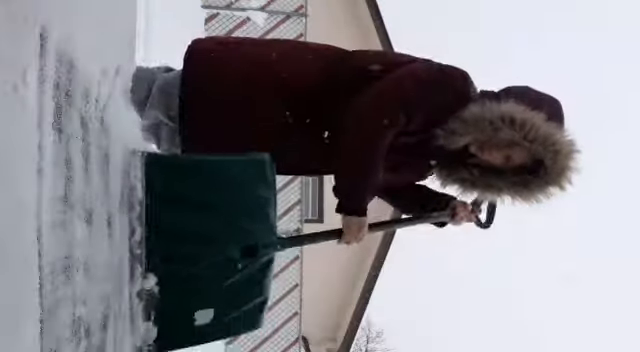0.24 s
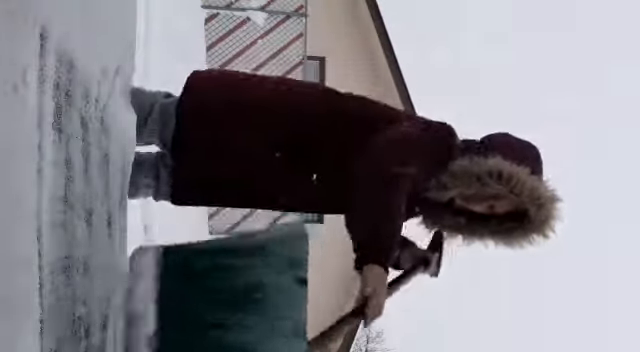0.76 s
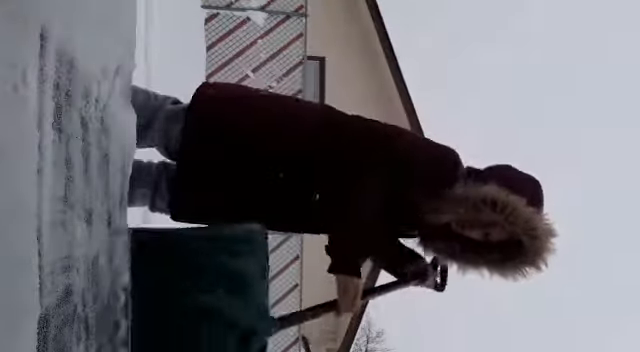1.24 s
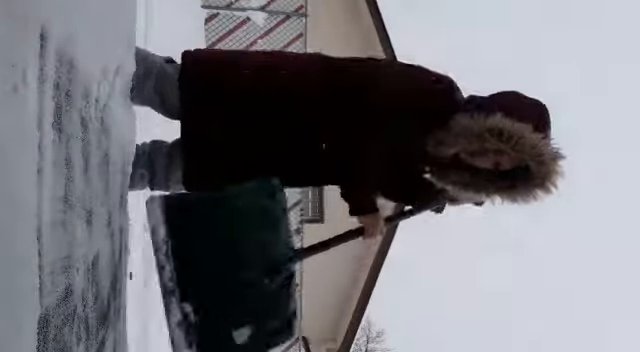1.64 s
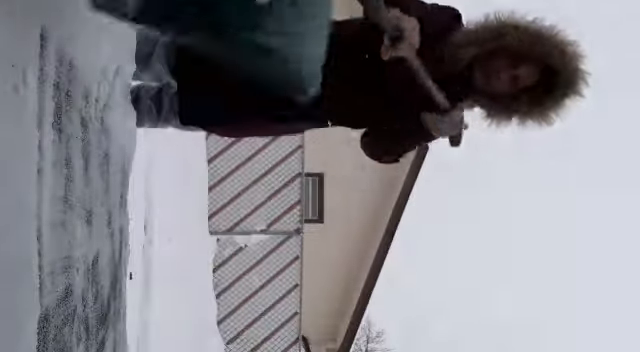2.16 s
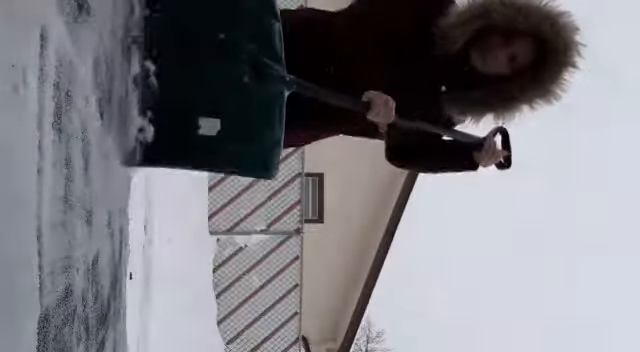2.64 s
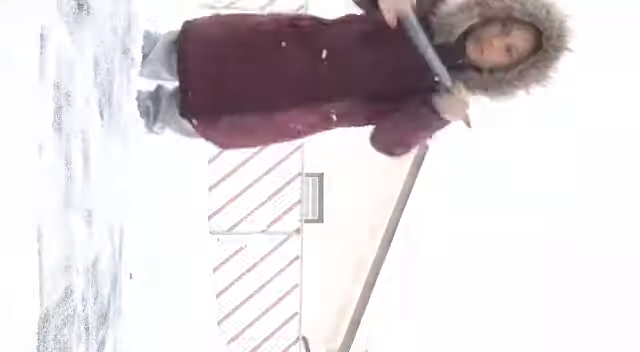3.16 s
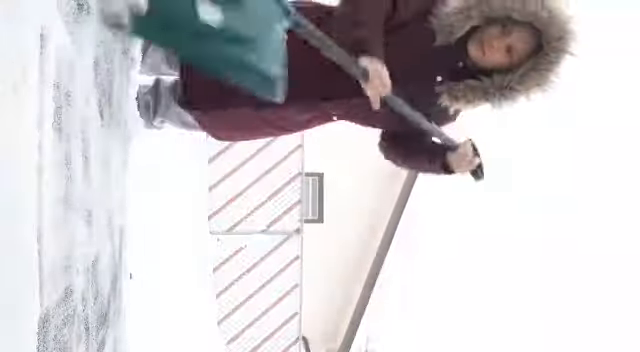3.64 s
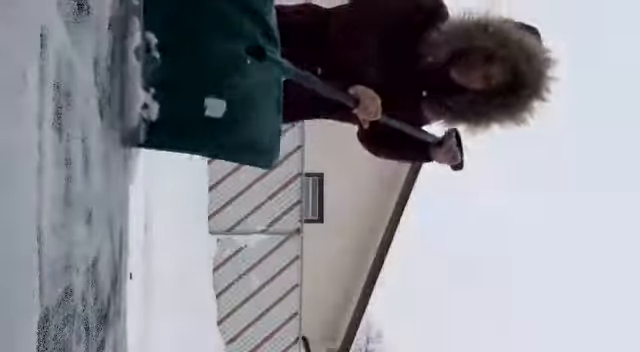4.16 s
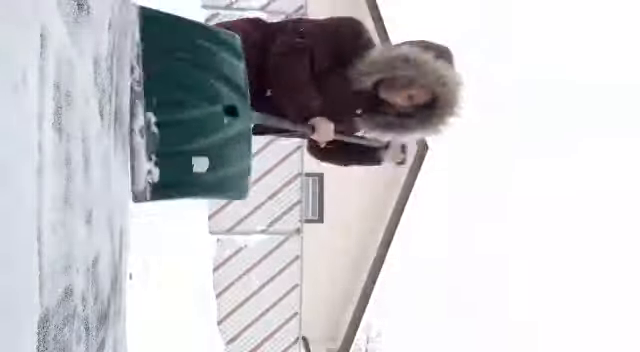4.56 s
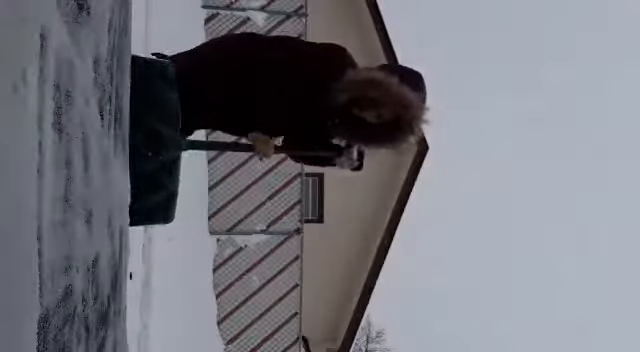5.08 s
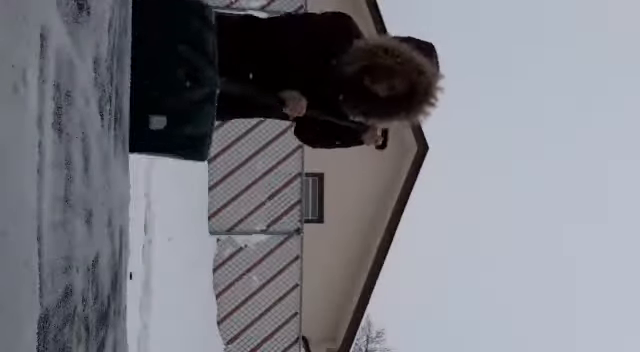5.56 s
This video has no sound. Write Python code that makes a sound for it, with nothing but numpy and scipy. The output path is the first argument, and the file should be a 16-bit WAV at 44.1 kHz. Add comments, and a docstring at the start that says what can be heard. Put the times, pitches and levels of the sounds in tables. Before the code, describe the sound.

Starting mid-stroke, a shovel scrapes hard and unevenly, lifts, then knocks down and scrapes again, about seven strokes in six seconds. The scoop booms like a hollow tub while its edge crackles, catches and squeaks on icy ground. Heard outdoors from a few steps away, mostly dry with a short reflection, the right side a little louder, and very quiet air between pushes.

```python
"""Snowy pavement in front of a house, a plastic snow shovel at work a few steps from two microphones.
Most strokes open with a hollow knock: a blow rings the decaying low modes of the scoop. The edge then
grinds over grit and ice, noise of tiny bursts through the blade's resonances, with catches and short
squeaks, while friction noise through the same low modes makes the scoop boom. Behind it lie a short
outdoor echo, dull swishes of coat, boots and snow, and a faint rumble of air."""
import sys
import numpy as np
from scipy import signal
from scipy.fft import rfft, irfft, next_fast_len
from scipy.io import wavfile
from scipy.ndimage import uniform_filter1d

SR = 44100
rng = np.random.default_rng(int(sys.argv[2]) if len(sys.argv) > 2 else 0)


def master_out(mix):
    """Clip the mix to full scale and print it as 16-bit PCM to the path in sys.argv[1]."""
    frames = np.transpose(np.atleast_2d(mix))
    ceiling = np.clip(frames, -1, 1)
    pcm = np.round(ceiling * 32767).astype(np.int16)
    wavfile.write(sys.argv[1], SR, pcm)


N = 256220
TIME = np.arange(N) / SR
SIZE = next_fast_len(N)
FREQ = np.maximum(np.arange(SIZE // 2 + 1) * SR / SIZE, 1)


def from_db(db):
    """Decibels to gain."""
    return 10 ** (np.asarray(db) / 20)


def rms_one(x):
    """Scale to unit power."""
    return x / np.sqrt(np.mean(x ** 2) + 1e-20)


def over_hz(points):
    """Join (Hz, value) points on a log-frequency axis."""
    hz, value = np.transpose(points)
    return np.interp(np.log(FREQ), np.log(hz), value)


def colour(x, gain):
    """Filter by a gain per frequency."""
    return irfft(rfft(x, SIZE) * gain, SIZE)[..., :N]


def drift(rate):
    """Smooth chance of spread 1: white noise rolled off above a rate in Hz."""
    return rms_one(colour(rng.standard_normal(N), 1 / (1 + (FREQ / rate) ** 2)))


# How alike the two microphones hear diffuse noise: pitch_hz, likeness (1 = identical)
MIC_LIKENESS = [(40, .93), (130, .99), (300, .98), (500, .8), (700, .55), (1100, .85), (2000, .55),
                (4000, .3), (9000, .1)]


def stereo_noise():
    """Spectra of two white noises, more or less alike from band to band."""
    alike = np.clip(over_hz(MIC_LIKENESS), -1, 1)
    mid, side = rfft(rng.standard_normal((2, SIZE)))
    return np.sqrt(1 + alike) * mid + np.sqrt(1 - alike) * side * [[1], [-1]]


def coloured_noise(gain):
    """Stereo noise of unit power with a given gain per frequency."""
    return rms_one(irfft(stereo_noise() * gain, SIZE)[:, :N])


def pulses(envelope_of, rows):
    """Join short events, each (start_s, ..) with its own envelope, by power."""
    power = np.zeros(N)
    for start_s, *columns in rows:
        first = round(start_s * SR)
        age = TIME[:max(N - first, 0)][:SR // 4]
        power[first:][:len(age)] += envelope_of(age, *columns) ** 2
    return np.sqrt(power)


def snap(age, db, rise_s, decay_s):
    """A fast rise and an exponential fall."""
    return from_db(db) * (1 - np.exp(-age / rise_s)) * np.exp(-age / decay_s)


def bursts(rows, octaves):
    """Bell-shaped bursts of noise, each in its own band some octaves wide."""
    out = np.zeros((2, N))
    noise = irfft(stereo_noise(), SIZE)[:, :N]
    for centre_s, db, half_length_s, hz in rows:
        near = abs(TIME - centre_s) < 4 * half_length_s
        edges_hz = [hz / 2 ** (octaves / 2), hz * 2 ** (octaves / 2)]
        band = signal.butter(2, edges_hz, "band", fs=SR, output="sos")
        bell = np.exp(-.5 * ((TIME[near] - centre_s) / half_length_s) ** 2)
        burst = rms_one(bell * signal.sosfilt(band, noise[:, near]))
        out[:, near] += from_db(db) * np.sqrt(np.mean(bell ** 2)) * burst
    return out


# Spectrum of the winter air, strongest in the bass: pitch_hz, relative level_db per Hz
AIR_SPECTRUM = [(15, -60.5), (25, -38), (75, 0.5), (119, -3.5), (340, -12), (389, -12), (495, -13.5),
                (741, -18.5), (945, -19), (1200, -23), (3090, -33), (6550, -32), (8500, -41.5),
                (11500, -39.5), (15500, -70.5)]


def winter_air():
    """A faint rumble: steady bass-heavy noise whose level wavers slightly."""
    noise = coloured_noise(from_db(over_hz(AIR_SPECTRUM)))
    return from_db(-53) * noise * from_db(1.1 * drift(rate=5.7))


# Dull swishes and crunches of coat, boots and snow: centre_s, level_db, half_length_s, pitch_hz
BODY_SWISHES = [(0.532, -48, 0.015, 248), (0.83, -51.5, 0.018, 547), (1.79, -46.5, 0.055, 392),
                (4.63, -52.5, 0.033, 250), (4.79, -56, 0.22, 881)]


def swishes():
    """Cloth and snow rub softly between strokes: broad, bell-shaped bursts of noise."""
    return bursts(BODY_SWISHES, octaves=1.52)


def yard(x, t60, delay_s, dull_hz):
    """A scattered tail that builds up after a delay and dies away, as from the house front and the ground."""
    age = TIME[:SR // 2]
    build_up = np.clip(age / delay_s - 1, 0, 1)
    tail = rng.standard_normal((2, len(age))) * from_db(-60 * age / t60) * build_up
    tail /= np.sqrt(np.sum(tail ** 2, axis=1, keepdims=True))
    return colour(signal.fftconvolve(x, tail, axes=1)[:, :N], 1 / np.hypot(1, FREQ / dull_hz))


TOUCH_S = 0.011  # the edge meets or leaves the ground this fast
RING_OUT_S = 0.034  # the boom fades over this time after the edge lifts


def held(start, end, release_s):
    """A quick attack, a hold from start to end and a release."""
    return np.interp(TIME, [start - TOUCH_S, start, end, end + release_s], [0, 1, 1, 0])


# Pushes of the edge over the ground: pitch_factor of the loaded scoop, treble (relative tilt setting),
# and a pressure curve of time_s, grinding level_db, boom level_db
PUSHES = [(1.0, -2, [(0.0, -21.5, -20), (0.042, -30, -23), (0.104, -21.5, -20), (0.146, -38, -28.5),
          (0.168, -27.5, -33), (0.23, -30, -25), (0.292, -20, -33), (0.33, -56, -31)]),
          (.98, -5, [(0.95, -42, -23), (1.047, -33.5, -43.5), (1.069, -35.5, -41.5), (1.141, -36, -40.5),
          (1.258, -27.5, -24.5), (1.35, -41.5, -27), (1.457, -29, -29.5), (1.504, -38, -41),
          (1.56, -40, -43.5)]), (.98, 0, [(2.345, -34, -23), (2.387, -32, -44), (2.469, -36.5, -38),
          (2.506, -20, -20.5), (2.608, -27, -25.5), (2.63, -31, -37), (2.752, -33.5, -35),
          (2.795, -54, -40)]), (1, 2.5, [(3.317, -38, -36), (3.409, -42, -38), (3.486, -16.5, -27),
          (3.633, -33.5, -37.5), (3.655, -18.5, -28), (3.732, -28.5, -31), (3.754, -37.5, -31.5),
          (3.951, -46, -48), (3.975, -59, -75)]), (.88, -3.5, [(4.28, -41, -19), (4.327, -39, -33.5),
          (4.349, -37, -30.5), (4.431, -26, -26), (4.468, -22.5, -32), (4.49, -39.5, -41)]),
          (.96, -8.5, [(4.96, -48, -30), (5.037, -41.5, -45), (5.059, -43.5, -42), (5.131, -33, -44),
          (5.168, -47, -45), (5.265, -35.5, -39), (5.295, -68, -74)]), (0.83, -8, [(5.722, -39.5, -36.5),
          (5.764, -44, -51), (5.81, -36, -10.5)])]


def per_stroke(values):
    """Hold one value through each stroke and glide to the next in between."""
    ends = [point[0] for _, _, curve in PUSHES for point in (curve[0], curve[-1])]
    return np.interp(TIME, ends, np.repeat(values, 2))


def stroke_controls():
    """Drag gain, treble setting and boom gain; the drag is zero while the edge is lifted."""
    drag, push = 0, 0
    for _, _, curve in PUSHES:
        s, grind_db, boom_db = np.transpose(curve)
        drag = drag + held(s[0], s[-1], TOUCH_S) * from_db(np.interp(TIME, s, grind_db))
        push = push + held(s[0], s[-1], RING_OUT_S) ** 2 * from_db(np.interp(TIME, s, boom_db))
    return drag, per_stroke([treble for _, treble, _ in PUSHES]), push


def load_shift(x):
    """The load on the blade retunes the scoop from stroke to stroke."""
    pitch = per_stroke([factor for factor, _, _ in PUSHES])
    return np.interp(np.cumsum(pitch) % (N - 1), np.arange(N), x)


# Low modes of the scoop before load and damping factors: pitch_hz, relative level_db, t60_s
SCOOP_MODES = [(92, -18.5, 0.086), (148, -11, 0.055), (201.1, 3, 0.038), (244, 4.5, 0.1),
               (304.6, -6.5, 0.03), (341.6, -13, 0.1), (388.3, -20.5, 0.04), (395.5, -14, 0.081),
               (462, -17, 0.061), (600, -18, 0.037)]


def off_centre(hz):
    """0 up to the scoop's main mode, 1 from half an octave above it."""
    main_hz = SCOOP_MODES[3][0]
    return np.clip(2 * np.log2(hz / main_hz), 0, 1)


def boom(push, ring_factor, wander_db, side_db):
    """The dragging edge shakes the scoop: noise through its low modes, the upper ones weakened."""
    out = 0
    for hz, db, t60 in SCOOP_MODES:
        width_hz = np.log(1000) / (np.pi * t60 * ring_factor)
        resonance = 1 / np.hypot(1, (FREQ / hz - hz / FREQ) * hz / width_hz)
        mode = rms_one(colour(rng.standard_normal(N), resonance))
        out = out + from_db(db + side_db * off_centre(hz)) * mode
    # friction limits the swing, so the boom is steadier than free noise
    steady = out / np.sqrt(uniform_filter1d(out ** 2, size=SR // 30) + 1e-9)
    return load_shift(steady) * push * from_db(wander_db * drift(rate=54))


# The blade knocks on the ground: start_s, level_db, pitch_factor, ring_length_factor,
# level_db of the cracking snow crust, upper modes' added level_db
GROUND_KNOCKS = [(.002, -9, 0.81, 0.4, -42, -16), (0.12, -16, 1.05, 1.2, -19.5, -2),
                 (0.171, -17.5, 0.8, 0.66, -31, -7), (0.306, -16.5, 1.01, 1.1, -47, -9),
                 (0.921, -6.5, 1.015, 0.81, -18, -1), (1.191, -17, 1.02, 0.74, -52, 6.5),
                 (1.479, -17, 0.87, 1.33, -22, -9), (2.3064, -5.5, 1.014, 1.65, -14.5, 4),
                 (2.51, -13, 0.96, 0.75, -18.5, -10.5), (3.2354, -19, 1.03, 1.38, -21.5, 9),
                 (3.3544, -16.5, 1.025, 1.8, -24, -7), (4.2285, -8.5, .897, 0.79, -24.5, 10.5),
                 (4.271, -3, .84, 0.55, -28, 3.5), (4.93, -12, 0.88, 0.53, -25.5, 21.5),
                 (5.018, -14.5, 0.98, 0.34, -26.5, 12), (5.194, -27, 0.9, 0.55, -32, -2),
                 (5.773, -10, 1.01, 0.68, -13.5, 16)]


def knocks(contact_s):
    """Each knock rings the scoop; load shifts and damps it, and a blow on a corner wakes the upper modes."""
    out = np.zeros(N)
    for start_s, db, pitch, length, _, side_db in GROUND_KNOCKS:
        first = round(start_s * SR)
        age = TIME[:N - first][:SR // 3]
        ring = 0
        for hz, mode_db, t60 in SCOOP_MODES:
            start_db = mode_db + side_db * off_centre(hz) + rng.normal(0, 1)
            decay = from_db(start_db - 60 * age / (t60 * length))
            ring = ring + decay * np.sin(2 * np.pi * hz * pitch * age)
        out[first:][:len(age)] -= from_db(db) * ring * (1 - np.exp(-(age / contact_s) ** 2))
    return out


def radiate(x, low_hz):
    """The open scoop radiates little deep bass."""
    cut = signal.butter(2, low_hz, "high", fs=SR, output="sos")
    return signal.sosfilt(cut, signal.sosfilt(cut, x))


# The edge catches on a rough spot and slips free: start_s, level_db, decay_s
EDGE_CATCHES = [(0.058, -15, 0.0099), (0.078, -10.5, 0.012), (.239, -10, .012), (.274, -16.5, 0.013),
                (.284, -6.5, 0.012), (1.188, -20.5, .007), (1.253, -14, 0.013), (1.474, -13, 0.016),
                (1.501, -15, 0.009), (2.37, -20, .012), (2.384, -15, .012), (2.45, -21, 0.0085),
                (2.483, -30.5, 0.0059), (2.505, -18.5, 0.036), (2.558, -15.5, 0.031), (2.596, -7, 0.0049),
                (2.623, -12.5, 0.0024), (2.662, -18.5, .007), (2.764, -23, .009), (3.425, -28.5, .004),
                (3.478, -15, 0.004), (3.591, -18.5, 0.032), (3.643, -18.5, .01), (3.671, -10, .008),
                (3.721, -10.5, 0.009), (3.782, -21.5, 0.015), (3.856, -34.5, .008), (4.35, -15, 0.0043),
                (4.416, -20, 0.012), (5.087, -29, .012), (5.127, -27.5, .008), (5.246, -23.5, 0.018)]
CATCH_RISE_S = .0012
KICK_DB, KICK_RISE_S, KICK_DECAY_S = -6, .004, 0.017  # jolt to the scoop, level relative to the catch


def scoop_sound(push):
    """The scoop booms under the drag, is jolted by each catch and rings with each knock."""
    kicks = pulses(snap, [(s, db + KICK_DB, KICK_RISE_S, KICK_DECAY_S) for s, db, _ in EDGE_CATCHES])
    booming = boom(np.hypot(push, kicks), ring_factor=1.9, wander_db=1.83, side_db=-7.0)
    return radiate(booming + knocks(contact_s=0.0021), low_hz=56)


BUMPS_DB, BUMPS_PER_S = 2.1, 18  # uneven ground makes the pressure waver
# small random snags, relative to the drag
SNAGS_PER_S, SNAG_DB, SNAG_SPREAD_DB, SNAG_DECAY_S = 43, 4.5, 3.5, .005


def rough_ground():
    """Gain of the drag: it wavers over bumps and jumps at small snags."""
    times = TIME[rng.random(N) < SNAGS_PER_S / SR]
    sizes_db = SNAG_DB + SNAG_SPREAD_DB * np.clip(rng.standard_normal(len(times)), -1, 1)
    snags = pulses(snap, [(s, db, CATCH_RISE_S, SNAG_DECAY_S) for s, db in zip(times, sizes_db)])
    return rms_one(np.hypot(1, snags)) * from_db(BUMPS_DB * drift(rate=BUMPS_PER_S))


# The lifted blade brushes the snow: start_s, level_db, rise_s, decay_s
SNOW_BRUSHES = [(.496, -50, .001, 0.0067), (.86, -44, 0.048, 0.12), (1.853, -39, 0.022, 0.019),
                (2.174, -44, 0.023, 0.049), (2.282, -41.5, 0.015, 0.052)]
CRACK_RISE_S, CRACK_DECAY_S = 0.00046, 0.013
TRICKLE_DB, TRICKLE_DECAY_S = -49.5, 0.02  # loose snow runs on after each stroke


def edge_force(drag):
    """Drag over uneven ground, plus catches, cracking crust, brushed snow and the trickle after each stroke."""
    catches = [(s, db, CATCH_RISE_S, decay_s) for s, db, decay_s in EDGE_CATCHES]
    cracks = [(s, crack_db, CRACK_RISE_S, CRACK_DECAY_S) for s, _, _, _, crack_db, _ in GROUND_KNOCKS]
    trickles = [(curve[-1][0], TRICKLE_DB, TOUCH_S, TRICKLE_DECAY_S) for _, _, curve in PUSHES]
    return np.hypot(drag * rough_ground(), pulses(snap, catches + cracks + trickles + SNOW_BRUSHES))


def grit(per_s, spread_db, grain_s):
    """Joint envelope of grains of ice and grit that break under the edge at random, each a very short burst."""
    sizes = from_db(spread_db * np.minimum(rng.exponential(1, N), 4))
    breaks = sizes * (rng.random(N) < per_s / SR)
    fade = np.exp(-2 / (grain_s * SR))
    return rms_one(np.sqrt(signal.lfilter([1], [1, -fade], breaks ** 2 + 1e-18)))


def wandering_contact(hz, shape, streak_db, streak_top_hz):
    """The contact point wanders along the edge, so resonances come and go every few hundredths of a second."""
    streaks = rng.standard_normal(shape)
    for axis in (0, 1, 0, 1):  # smooth over pitch and time, twice
        streaks = uniform_filter1d(streaks, size=3 + 3 * axis, axis=axis)
    depth_db = streak_db / np.hypot(1, hz / streak_top_hz)[:, None]
    shifting = from_db(depth_db * np.clip(rms_one(streaks), -2, 2))
    return shifting / np.sqrt(np.mean(shifting ** 2, axis=1, keepdims=True))


# Upper resonances of the blade: pitch_hz, width_hz, level_db above the grinding spectrum
BLADE_PEAKS = [(445, 17, 13.5), (760, 97, 9.5), (1031, 210, 9), (1400, 60, -0.5), (1440, 50, 1),
               (1642, 180, 1), (1980, 210, 0.5), (2300, 38, 3.5), (2820, 80, 4.5), (4000, 130, 2.5),
               (6660, 620, 3)]
# Spectrum of the grinding edge under those peaks: pitch_hz, relative level_db per Hz
GRIND_SPECTRUM = [(200, -29.5), (380, -1.5), (520, -6), (850, -7.5), (1150, -5.5), (1700, -1.5), (2600, -7),
                  (4100, -6.5), (5200, -10.5), (7000, -7), (7800, -18), (11100, -20), (13500, -26.5),
                  (15500, -48)]


def grinding(force, treble, neutral, tilt, streak_db, streak_top_hz):
    """Breaking grit excites the blade's upper resonances; bare pavement is brighter than snow."""
    peaks_db = sum(db / (1 + (2 * (FREQ - hz) / width) ** 2) for hz, width, db in BLADE_PEAKS)
    noise = coloured_noise(from_db(over_hz(GRIND_SPECTRUM) + peaks_db))
    hz, s, frames = signal.stft(noise, SR, nperseg=512)
    octaves = np.log2(np.clip(hz / 1000, .6, 4))[:, None]
    slope_db = tilt * octaves * (np.interp(s, TIME, treble) - neutral)
    shifting = wandering_contact(hz, frames.shape[1:], streak_db, streak_top_hz)
    return force * signal.istft(frames * from_db(slope_db) * shifting, SR)[1][:, :N]


# Where it sticks, the edge judders at one pitch and squeaks: centre_s, level_db, pitch_hz
EDGE_SQUEAKS = [(.198, -31, 1800), (.292, -31.5, 1050), (1.485, -17.5, 1220), (2.484, -39, 860),
                (2.52, -28.5, 1160), (2.566, -16, 1630), (2.667, -24, 1000), (2.71, -28.5, 1620),
                (2.745, -30, 1730), (3.483, -20.5, 3900), (3.536, -19, 2360), (3.594, -22.5, 3700),
                (3.676, -18.5, 1600), (3.721, -17, 3040), (3.723, -19, 1690), (4.446, -28, 1120),
                (4.468, -36, 796)]
SQUEAK_HALF_S, SQUEAK_OCTAVES = 0.0054, 0.23


def squeaks():
    """Short narrow-band bursts where the edge sticks."""
    return bursts([(s, db, SQUEAK_HALF_S, hz) for s, db, hz in EDGE_SQUEAKS], octaves=SQUEAK_OCTAVES)


CHATTER_DB, CHATTER_PER_S = 1.27, 120  # stick and slip of the edge
# treble setting lost per dB that the edge bites harder than typical; below the lightest it gets no brighter
DULLING, TYPICAL_DB, LIGHTEST_DB = 0.15, -31, -45


def edge_sound(drag, treble):
    """The edge grinds, duller the harder it bites, and squeaks where it sticks."""
    force = edge_force(drag)
    bite_db = 20 * np.log10(np.maximum(force, from_db(LIGHTEST_DB))) - TYPICAL_DB
    chatter = rms_one(from_db(CHATTER_DB * drift(rate=CHATTER_PER_S)))
    grains = grit(per_s=4100, spread_db=3.0, grain_s=0.0029)
    grind = grinding(force * chatter * grains, treble - DULLING * bite_db,
                     neutral=-1.0, tilt=0.47, streak_db=3.5, streak_top_hz=4970)
    return grind + squeaks()


def shovel_sound():
    """Edge and scoop together; the hiss of the edge scatters off the scoop and the pavement."""
    drag, treble, push = stroke_controls()
    edge = edge_sound(drag, treble)
    near_scatter = from_db(-11) * yard(edge, t60=0.059, delay_s=0.002, dull_hz=14220)
    far_scatter = from_db(-27) * yard(edge, t60=0.32, delay_s=0.015, dull_hz=8000)
    edge = from_db(-1.28) * edge + near_scatter + far_scatter
    return edge + from_db(0.4) * scoop_sound(push)


# Level between the microphones: pitch_hz, left minus right level_db
MIC_BALANCE = [(60, -4.5), (300, -4), (480, -3.5), (720, -2.5), (1200, -4.5), (2200, -5), (5000, -6.5),
               (9000, -2.5), (15000, -2.7)]
# Phase between the microphones: pitch_hz, lead of the left in radians
MIC_LEAD = [(60, .03), (250, .14), (600, .15), (860, -2.0), (1290, -1.1), (2840, -2.0), (4000, -1.3),
            (6000, -1.9)]


def microphone_pair(x):
    """Level and phase differences per frequency, shared equally by the two microphones."""
    ear = np.array([[1], [-1]]) / 2
    return colour(x, from_db(over_hz(MIC_BALANCE) * ear) * np.exp(1j * over_hz(MIC_LEAD) * ear))


def scene():
    """The shovel, a little to the right, with its echo, the swishes and the still winter air."""
    shovel = shovel_sound()
    echo = from_db(-25) * yard(shovel, t60=0.32, delay_s=0.01, dull_hz=9000)
    return microphone_pair(shovel + echo + swishes() + winter_air())


def record(dry):
    """Peaks beyond full scale are clipped and the top is cut."""
    low_pass = signal.cheby2(16, 70, 16400, fs=SR, output="sos")  # 70 dB down from 16400 Hz up
    return signal.sosfilt(low_pass, np.clip(dry, -1, 1))


dry = scene()
out = record(dry)
master_out(out)
```